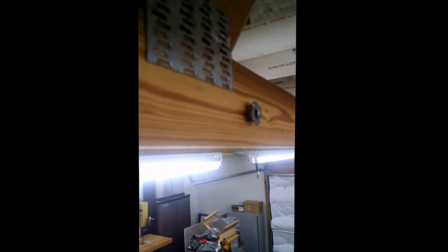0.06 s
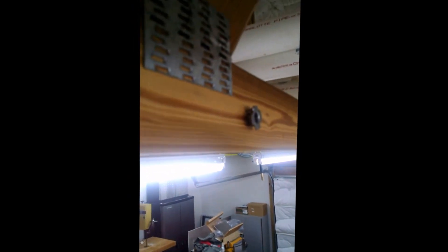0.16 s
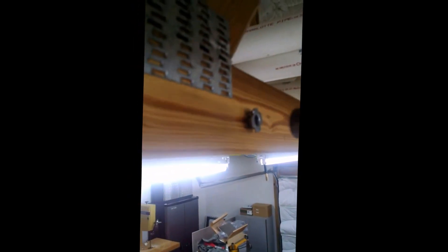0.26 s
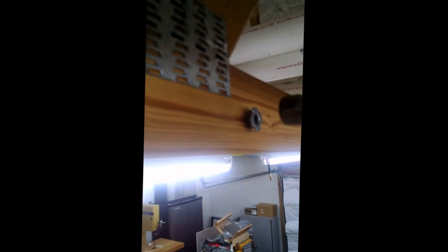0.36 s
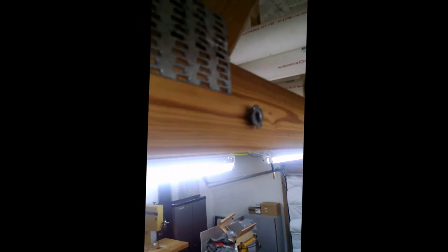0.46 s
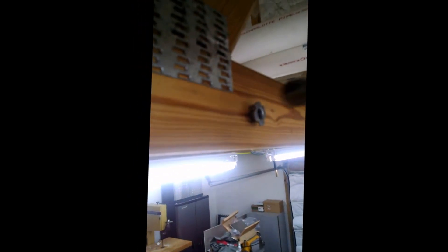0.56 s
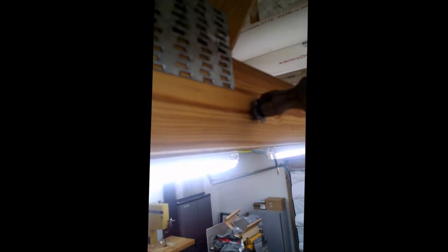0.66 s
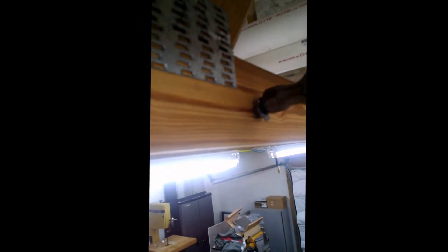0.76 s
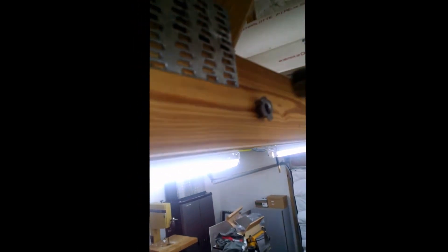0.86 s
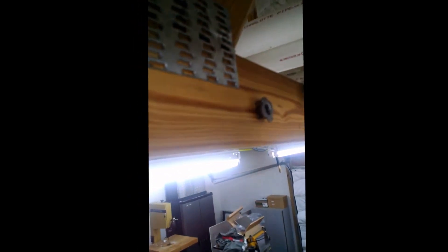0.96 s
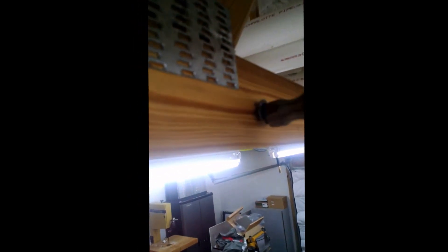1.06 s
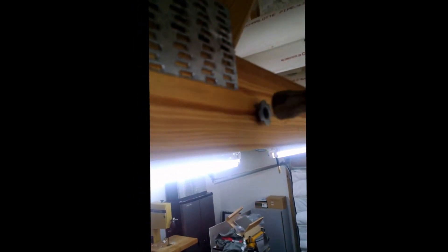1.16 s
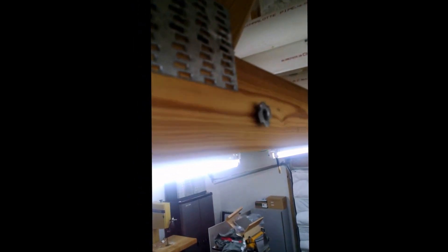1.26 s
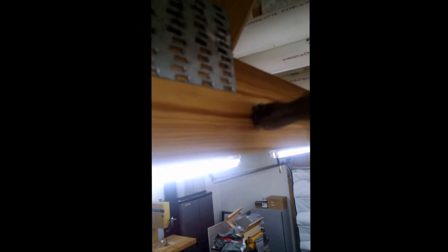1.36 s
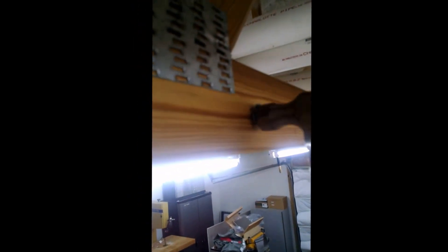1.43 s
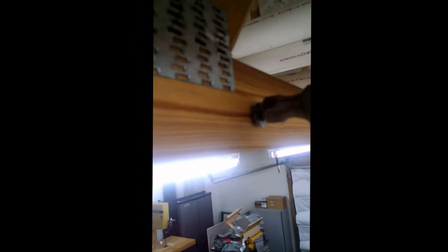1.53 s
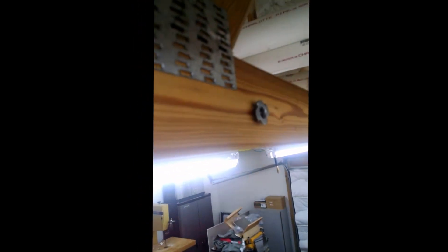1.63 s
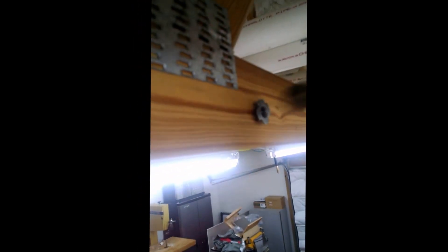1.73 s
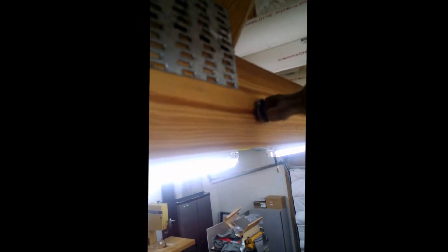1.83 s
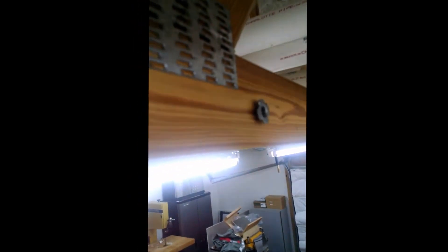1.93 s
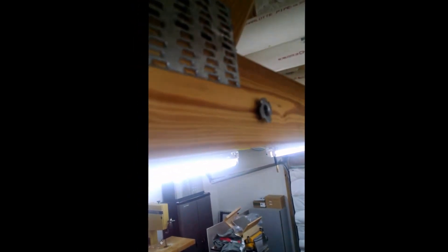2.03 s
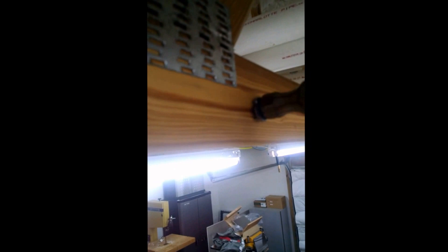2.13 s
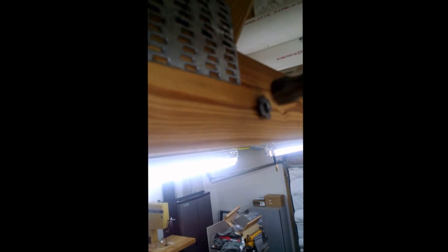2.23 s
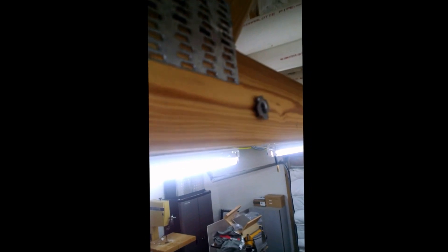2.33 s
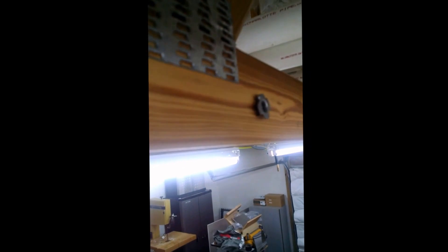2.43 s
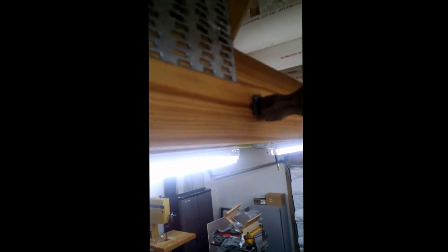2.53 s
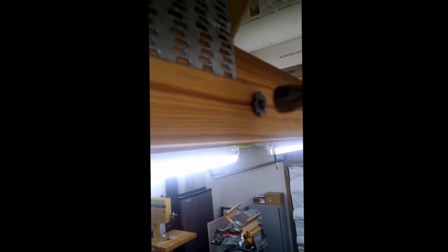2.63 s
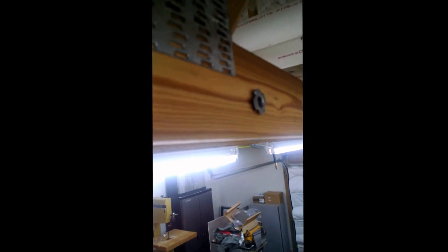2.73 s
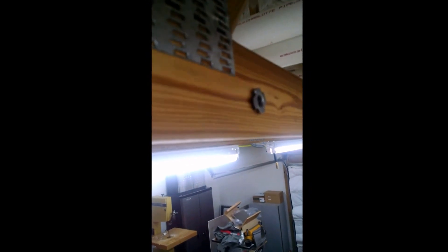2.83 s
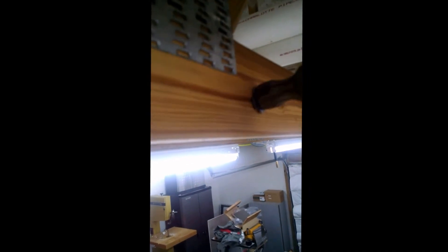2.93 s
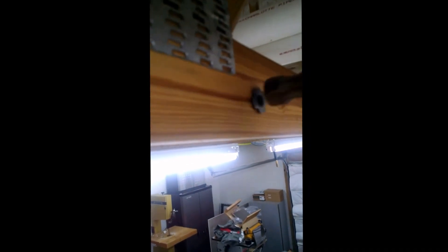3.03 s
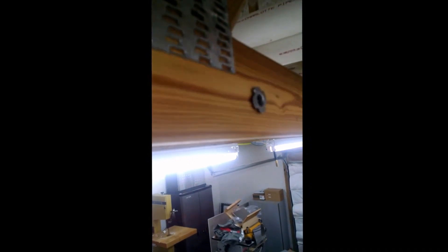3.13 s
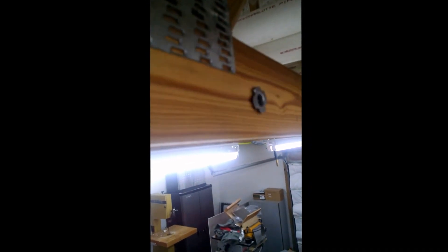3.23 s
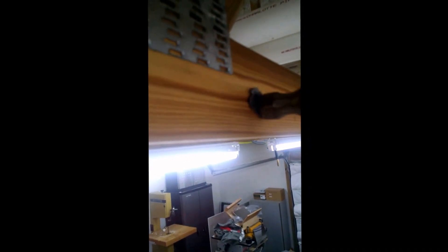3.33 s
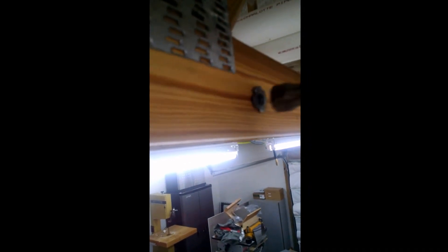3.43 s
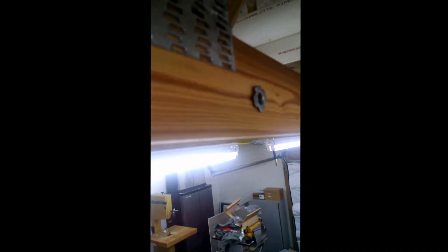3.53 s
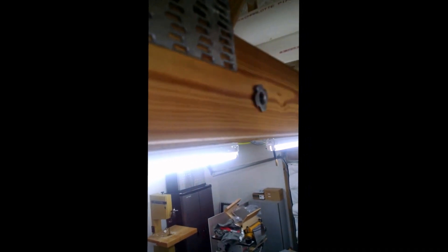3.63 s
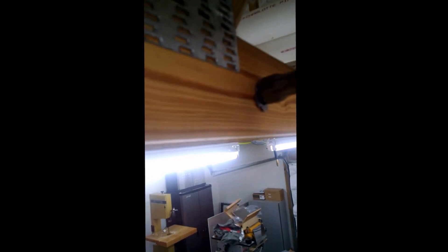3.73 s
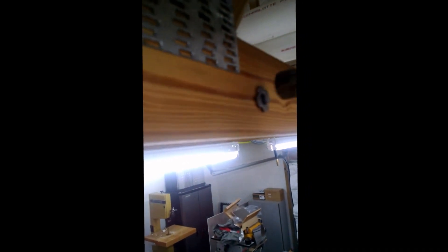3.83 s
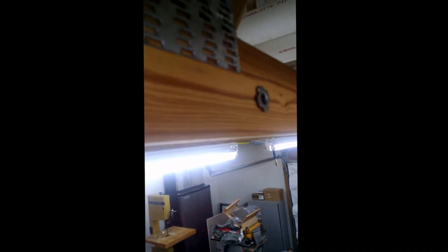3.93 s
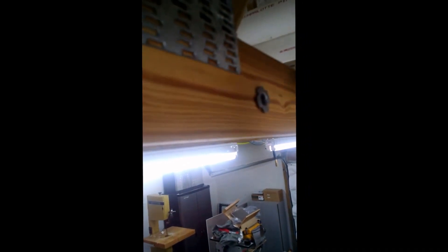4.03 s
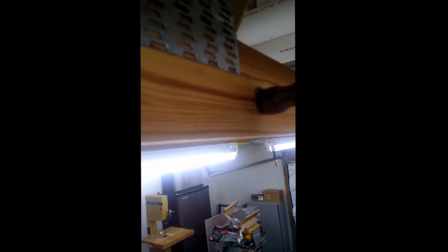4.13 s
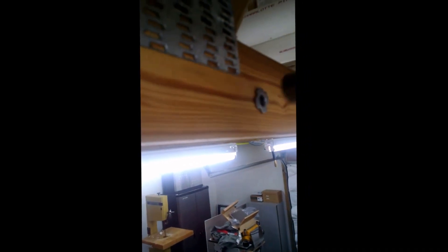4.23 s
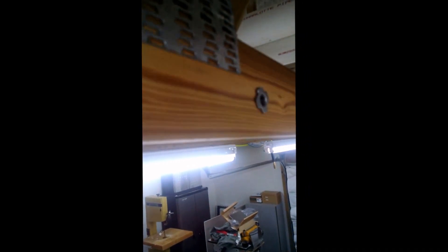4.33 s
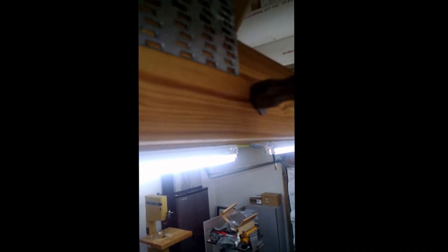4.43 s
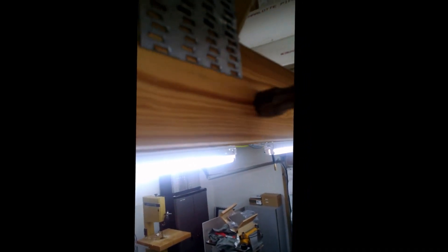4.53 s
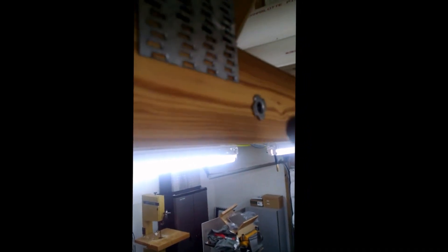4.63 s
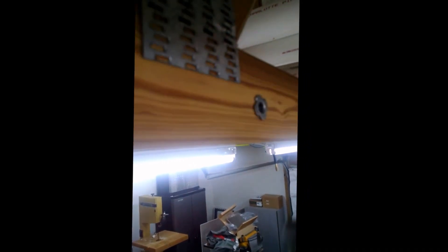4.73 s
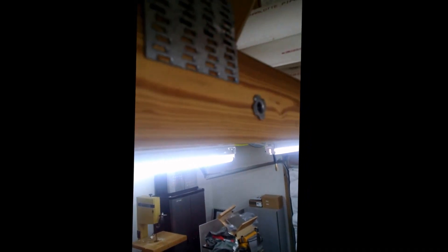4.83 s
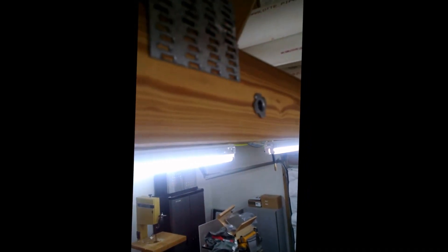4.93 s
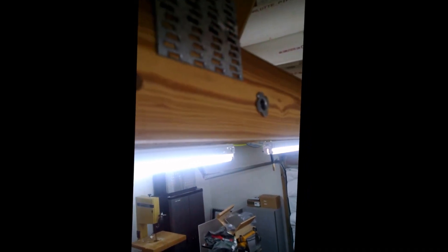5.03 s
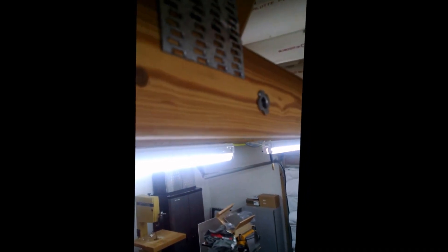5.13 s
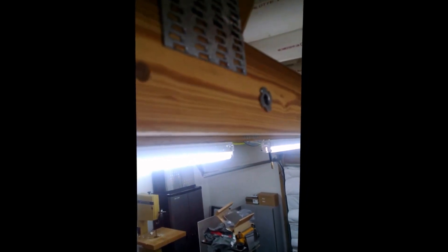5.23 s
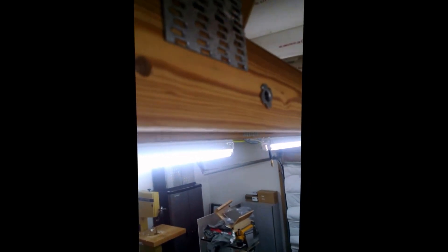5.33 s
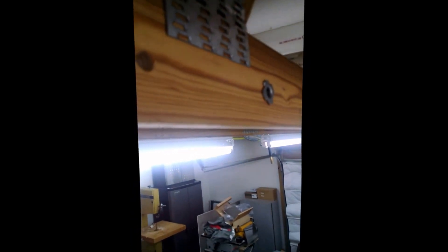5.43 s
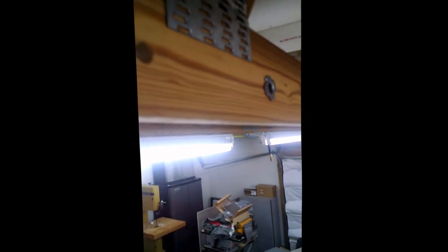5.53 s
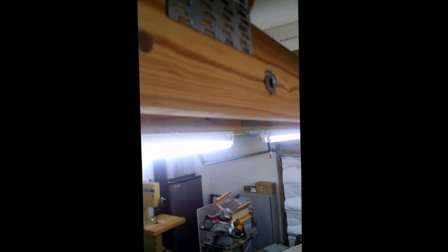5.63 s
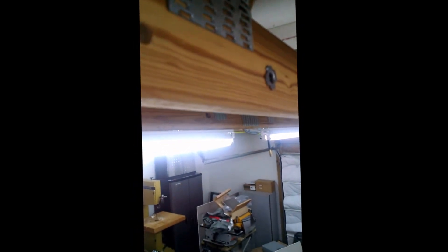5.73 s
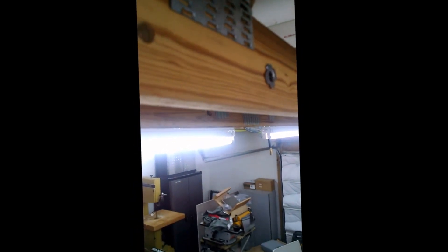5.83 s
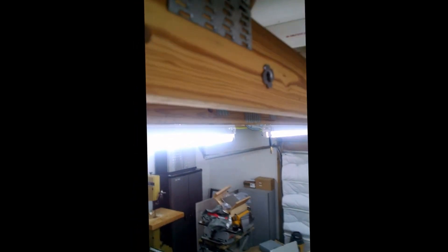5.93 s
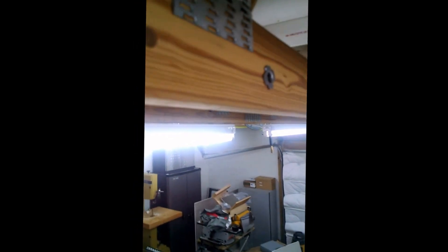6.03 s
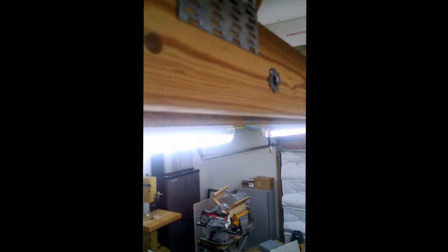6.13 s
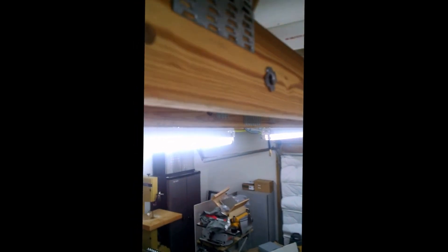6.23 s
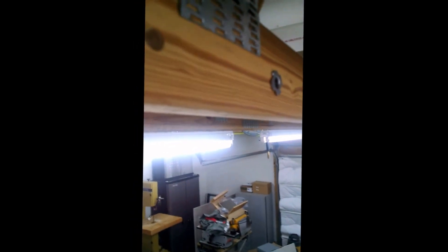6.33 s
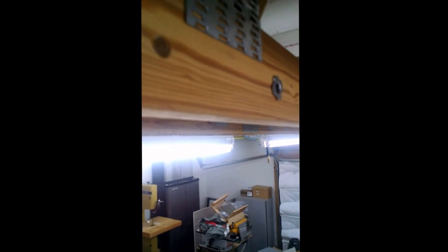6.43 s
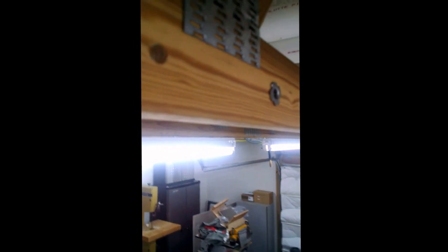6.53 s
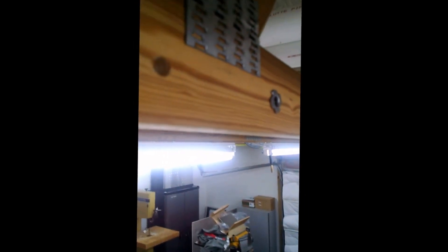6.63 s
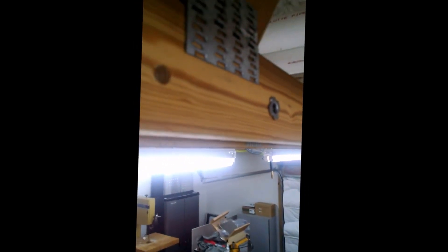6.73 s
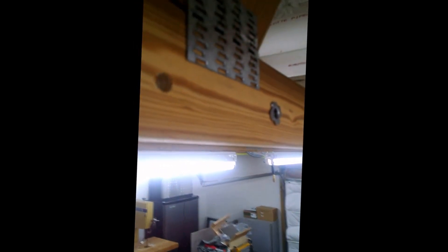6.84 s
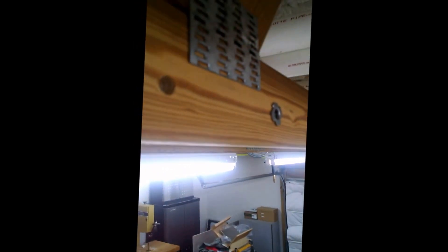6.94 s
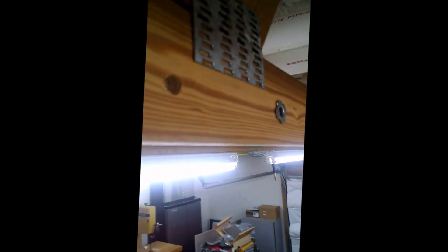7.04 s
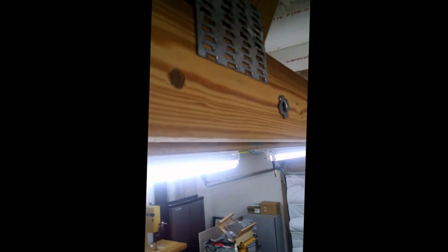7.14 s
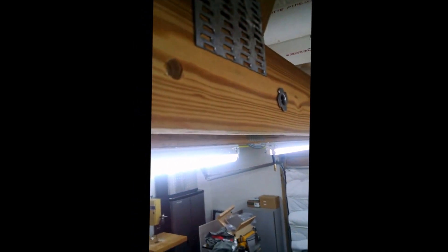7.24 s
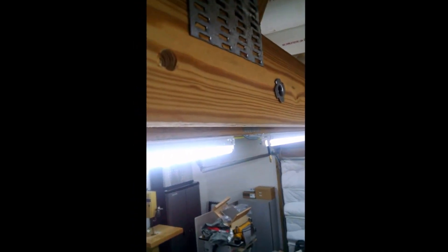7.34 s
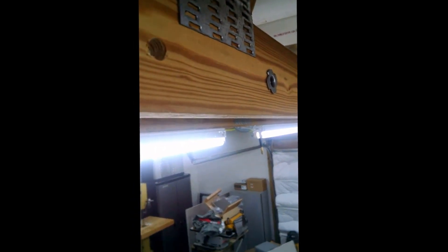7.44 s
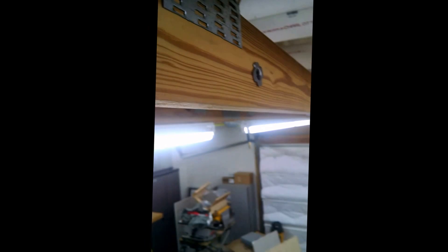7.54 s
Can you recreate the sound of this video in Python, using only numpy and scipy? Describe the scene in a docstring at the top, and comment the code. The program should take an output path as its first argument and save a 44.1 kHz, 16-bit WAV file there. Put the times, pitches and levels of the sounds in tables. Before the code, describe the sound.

Eleven hard hammer blows on a wooden beam, steady and rattling, then the hammer clatters onto a bench and fingers rub the microphone casing.

```python
"""A steel hammer drives a toothed nut into a pine beam in a workshop, close to a hand-held phone. Each blow is a
steel crack, a thud pulse and damped beam modes; loose parts rattle back and the shop answers in decaying noise.
Then the hammer drops on a bench (noise bursts and modes), and fingers rub and bump the phone's case (gated noise,
pushes and ticks), over rumble, hiss and, at first, a faint tone. The phone's two ports are widened to stereo
by subtracting each port, delayed, from the other."""
import sys
import numpy as np
from scipy import signal
from scipy.fft import rfft, irfft, next_fast_len
from scipy.io import wavfile
from scipy.ndimage import map_coordinates

SR = 44100
rng = np.random.default_rng(int(sys.argv[2]) if len(sys.argv) > 2 else 0)


def store_wav(level_fs):
    """Save 16-bit WAV to argv[1]."""
    pcm = np.round(np.clip(np.atleast_2d(level_fs), -1, 1) * 32767)
    wavfile.write(sys.argv[1], SR, pcm.T.astype(np.int16))


N = 334278
PORT_LAG_S = 17.3 / 44100  # travel time from one port to the other


def amp(db):
    """Decibels to an amplitude factor."""
    return np.exp(np.asarray(db) * np.log(10) / 20)


def unit(x):
    """Scale to rms 1."""
    return x / np.sqrt(np.mean(x ** 2) + 1e-20)


def along(points, hz):
    """Read a curve of (Hz, value) points on a log frequency axis."""
    point_hz, value = np.transpose(points)
    return np.interp(np.log(hz + 1), np.log(point_hz + 1), value)


def filtered(x, response):
    """Shape x in the spectrum by a complex response of frequency."""
    n = x.shape[-1]
    padded = next_fast_len(n + 4096)
    spectrum = rfft(x, padded) * response(np.fft.rfftfreq(padded, 1 / SR))
    return irfft(spectrum, padded)[..., :n]


def noise(spectrum, shape):
    """Coloured noise of rms 1."""
    white = rng.standard_normal(shape)
    return unit(filtered(white, lambda hz: amp(along(spectrum, hz))))


def click(spectrum):
    """One smooth pulse of energy 1 with this spectrum, centred on sample 200."""
    pulse = filtered(np.arange(400) == 200, lambda hz: amp(along(spectrum, hz)))
    return pulse / np.linalg.norm(pulse)


def wobble(rate):
    """A smooth random curve with this many knots a second."""
    knots = rng.standard_normal(int(N * rate / SR) + 4)
    return map_coordinates(knots, [np.arange(N) * rate / SR])


def ring(modes, t, scatter_db, rough):
    """Damped modes at new strengths each time; each phase wanders, rough in radians per root second."""
    hz, db, t60 = np.transpose(modes)[..., None]
    sign_draw, level_draw = rng.standard_normal((2, len(modes), 1))
    steps = rng.standard_normal((len(modes), len(t) // 8 + 1))  # one step every 8 samples
    walk = np.repeat(np.cumsum(steps, axis=1), 8, axis=1)[:, :len(t)]
    wander = rough * walk * np.sqrt(8 / SR)
    envelope = amp(db + scatter_db * level_draw - 60 * t / t60)
    return np.sum(np.sign(sign_draw) * envelope * np.sin(2 * np.pi * hz * t + wander), axis=0)


# How long the shop's main echo lasts. Each row: frequency in Hz, decay time (t60) in s.
SHOP_DECAY = [(60, 0.3), (160, 0.56), (420, 0.13), (1100, 0.3), (3000, 0.37), (8000, 0.26), (16000, .22)]


def echo(x, wet_db):
    """The shop's answer at both ports: a fresh noise tail each time, with a weak slower part from the far end."""
    hz, t, grid = signal.stft(rng.standard_normal((3, SR * 11 // 20)), SR, nperseg=256)
    fall_db = -60 * t / along(SHOP_DECAY, hz)[:, None]
    decay = amp(fall_db) + amp(-23 + .4 * fall_db)
    tail = signal.istft(grid * decay, SR, nperseg=256)[1]
    tail = tail[:2] + 0.62 * tail[2]  # part is common to the two ports
    tail = tail / np.linalg.norm(tail[0])
    return amp(wet_db) * signal.fftconvolve(x[None], tail, axes=1)


def add(out, s, x):
    """Mix x into out from s seconds, cut at the end of out."""
    part = out[:, round(s * SR):][:, :x.shape[1]]
    part += x[:, :part.shape[1]]


# Colour of each port's own rumble. Each row: frequency in Hz, relative density in dB.
OWN_RUMBLE = [(20, -17.5), (50, -8), (130, -1), (300, 3), (500, -7), (1000, -13.5), (2400, -6),
              (5000, -39.5)]
# Colour of the rumble common to both ports. Each row: frequency in Hz, relative density in dB.
COMMON_RUMBLE = [(20, -9), (40, -6), (130, 2), (300, -2.5), (500, -16), (1000, -22.5), (2000, -41.5)]
# Colour of the microphone hiss. Each row: frequency in Hz, relative density in dB.
MIC_HISS = [(1000, -23.5), (3000, -4.5), (7000, -7), (14500, -5.5), (16500, -12.5)]
RUMBLE_DB, HISS_DB = -51, -61  # before the first blow, ahead of the port gains
SINK_S, RUMBLE_SINK_DB, HISS_SINK_DB = .05, 16.5, 9.5  # both sink with the first blow and stay down
OPENING_DB, OPENING_S = 8, .15  # the hiss starts louder and settles
TONE_HZ, TONE_SAG_HZ_PER_S, TONE_DB, TONE_END_S, TONE_FADE_S = 1450, 60, -63, .53, .03


def background():
    """Shop rumble, partly common to the ports, microphone hiss, stronger at B, and a faint sinking tone."""
    now = np.arange(N) / SR
    sunk = np.clip((now - BLOWS[0][0]) / SINK_S, 0, 1)
    rumble_db = RUMBLE_DB - RUMBLE_SINK_DB * sunk
    hiss_db = HISS_DB - HISS_SINK_DB * sunk + OPENING_DB * np.exp(-now / OPENING_S)
    fade = np.clip((TONE_END_S - now) / TONE_FADE_S, 0, 1) * amp(2.5 * wobble(10))
    phase = 2 * np.pi * (TONE_HZ - TONE_SAG_HZ_PER_S * now / 2) * now
    tone = np.sqrt(2) * amp(TONE_DB) * fade * np.sin(phase)
    own = noise(OWN_RUMBLE, (2, N)) * amp([[-13], [-6]])
    common = noise(COMMON_RUMBLE, N) * amp([[2.5], [4]])
    rumble = amp(rumble_db + 1.6 * wobble(31)) * (own + common)
    hiss = amp(hiss_db + 0.95 * wobble(22)) * noise(MIC_HISS, (2, N)) * amp([[-1.5], [0]])
    return rumble + hiss + tone * amp([[-11], [-5]])


# Colour of skin hissing over the case. Each row: frequency in Hz, relative density in dB.
SKIN_HISS = [(2000, -26.5), (4000, -14.5), (7000, -10.5), (10000, -5), (14500, -3.5), (16500, -13)]
# Colour of the case being scraped. Each row: frequency in Hz, relative density in dB.
CASE_SCRAPE = [(20, -13.5), (60, -1), (200, -4.5), (500, -9), (1000, -16), (2500, -19), (5000, -36.5)]
# Finger strokes, each swelling to a peak and dying. Each row: peak time in seconds, hiss level in dB,
# scrape level in dB re the hiss, rise in s, fall in s (both over 20 dB).
STROKES = [(5.98, -43, -6, .12, .015), (6.0, -55, 0, .01, .14), (6.16, -49, -9, .01, .07),
           (6.3, -55, -5, .15, .04), (6.333, -40, -12, .01, .12), (6.387, -40, 15, .03, .02),
           (6.555, -44.5, 3, .04, .2), (6.645, -48, 2, .1, .07), (6.872, -36, 0, .004, .022),
           (6.925, -50, 10, .05, .12), (7.15, -43, 5, .14, .1), (7.225, -31, 0, .045, .022),
           (7.32, -45, 10, .08, .1), (7.405, -34, 7, .09, .09), (7.48, -46, 6, .05, .07),
           (7.545, -38, 7, .05, .04), (7.58, -28, 1, .025, .02)]
GRIP_S, GRIP_DB, GRIP_SCRAPE_DB = 6.15, -66, 9  # from here on the resting hand rubs faintly; scrape re hiss
# Colour of the ticks and of the catching ridges. Each row: frequency in Hz, relative density in dB.
TICK = [(200, 13.5), (1000, -3), (3000, -5), (6000, -14.5), (15000, -5.5)]
# Shifts of grip. Each row: start in seconds, push level in dB, tick level in dB, push time constant in ms.
GRIP_SHIFTS = [(6.157, -37, -47, 1.9), (6.301, -31, -35, .6), (6.381, -36, -18, 3.2),
               (6.417, -27, -46, 2.7), (6.441, -15, -22, 1.02), (6.549, -27, -43, 1.1),
               (6.64, -19, -35, 1.1), (6.684, -24, -55, .58), (6.817, -31, -45, .53), (6.869, -25, -33, .7),
               (6.907, -35, -42, 1.2), (6.99, -22, -39, 1.6), (7.088, -28, -44, .92), (7.117, -20, -45, .7),
               (7.139, -30, -48, .7), (7.159, -29, -40, .73)]


def rubbing(speed, pressure):
    """Skin slips in grains: hiss follows the finger's speed, scrape its pressure, with ridges that catch."""
    slips = amp(1.5 * wobble(70) + 1.7 * wobble(600))
    catches = (rng.random(N) < 150 / SR) * amp(1.7 * rng.standard_normal(N))  # about 150 a second
    hiss = speed * unit(slips * noise(SKIN_HISS, N))
    grain = unit(filtered(catches, lambda hz: amp(along(TICK, hz))))
    body = slips * amp(3.5 * wobble(25)) * noise(CASE_SCRAPE, N)
    return hiss + pressure * unit(body + 0.2 * grain)


def grip_shift(push_db, tick_db, push_ms):
    """The case is pushed in and springs back in one slow pulse, with a short noise tick."""
    t = np.arange(SR // 20) / SR
    u = t * 1000 / max(push_ms, .2)
    push = -4 * u * (1 - u / 2.2) * np.exp(-u)
    return amp(push_db) * push + amp(tick_db - 60 * t / 0.023) * noise(TICK, len(t))


def fingers():
    """Fingers rub and bump the case beside port B; port A gets a trace of that and the rubbing through the air."""
    now = np.arange(N) / SR
    peak_s, hiss_db, scrape_db, rise_s, fall_s = np.transpose(STROKES)[..., None]
    slope_s = np.where(now < peak_s, rise_s, fall_s)
    swell = amp(hiss_db - 20 * np.abs(now - peak_s) / slope_s)
    grip = amp(GRIP_DB) * np.clip((now - GRIP_S) / .1, 0, 1)
    speed = grip + swell.sum(axis=0)
    pressure = amp(GRIP_SCRAPE_DB) * grip + (amp(scrape_db) * swell).sum(axis=0)
    touch = rubbing(speed, pressure)[None]
    for s, push_db, tick_db, push_ms in GRIP_SHIFTS:
        add(touch, s, grip_shift(push_db, tick_db, push_ms)[None])
    airborne = amp(-3) * speed * noise(SKIN_HISS, N)
    return np.array([0.02 * touch[0] + airborne, touch[0]])


# Bright clack of the dropped hammer. Each row: frequency in Hz, relative density in dB.
CLACK = [(600, -40), (2000, -15), (4000, 3), (8000, 3), (11000, -3), (15000, 2), (17000, -0.5)]
# Duller knock of the tool. Each row: frequency in Hz, relative density in dB.
KNOCK = [(60, -56), (120, -42), (260, -8.5), (450, 9), (700, -3.5), (1400, -2.5), (3000, 0), (4500, -32.5)]
# Modes of the bench. Each row: frequency in Hz, relative level in dB, decay time (t60) in s.
BENCH_MODES = [(280, -5.5, 0.5), (354.5, -4.5, 0.37), (405, -6, 0.47), (476, -2, 0.1), (960, -16, 0.3),
               (1333, -14, 0.3), (1450, -7, 0.14), (2190, -12, 0.05), (2840, -6.5, 0.22)]
# The hammer lands and rocks. Each row: start in seconds, level in dB, brightness in dB re that level.
LANDINGS = [(5.444, -9, -17), (5.478, -8, -6), (5.574, -14.5, -6.5), (5.629, -10, -18),
            (5.666, -22.5, -12.5), (5.711, -19, -22), (5.729, -21.5, -14), (5.759, -24.5, -20.5),
            (5.789, -25, -18.5)]


def dropped():
    """The hammer clatters on the bench beyond port B; A hears it later and, shaded by the phone, duller."""
    out, t = np.zeros((2, N)), np.arange(SR // 3) / SR
    for s, db, bright_db in LANDINGS:
        clack = noise(CLACK, len(t)) * amp(-60 * t / 0.013) * (1 - np.exp(-t / 0.0013))
        clack = amp(db + bright_db + 8.5) * clack
        knock = amp(db + .8) * noise(KNOCK, len(t)) * amp(-60 * t / 0.02) * (1 - np.exp(-t / 0.0012))
        board = amp(db - 16) * ring(BENCH_MODES, t, scatter_db=3, rough=13.4)
        board = board * (1 + 0.5 * amp(-60 * t / 0.028))  # stronger at the onset
        add(out, s, (clack + knock + board) * amp([[-25], [3]]))
        into_shop = amp(bright_db + 23) * click(CLACK) + amp(14) * click(KNOCK)
        add(out, s, echo(into_shop, wet_db=db) * amp([[-13], [0]]))
    shaded = filtered(out[1], lambda hz: .5 * np.exp(-2j * np.pi * hz * PORT_LAG_S) / (1 + (hz / 750) ** 4))
    ports = np.array([out[0] + shaded, out[1]])
    return filtered(ports, lambda hz: hz ** 2 / (hz ** 2 + 90 ** 2))  # the bench gives no deep bass


# Colour of the steel crack. Each row: frequency in Hz, relative density in dB.
STEEL = [(150, -16), (600, 4.5), (1500, -6), (3400, -6), (6000, -12), (10000, -13), (15300, -10),
         (17000, -30.5)]


def steel_crack(t):
    """Steel on steel: bright noise with a fast decay and a weaker, slower one."""
    return noise(STEEL, len(t)) * (amp(-60 * t / 0.013) + amp(-22.5 - 60 * t / .06))


def thud(t):
    """The beam takes the blow: one short pulse around 600 Hz."""
    return (t / 0.0013) * np.exp(1 - t / 0.00069) * np.cos(2 * np.pi * 600 * (t - .0013))


# Modes of beam and joists. Each row: frequency in Hz, relative level in dB, decay time (t60) in s.
BEAM_MODES = [(166.8, -5.5, 0.13), (213.6, -10, .25), (257.4, -13.5, 0.47), (296.6, -4.5, 0.22),
              (353.3, -9.5, 0.31), (425.2, -2, .2), (470.4, -11.5, 0.28), (536, -7.5, 0.13),
              (686.5, -7.5, 0.094), (742.3, -3, 0.09), (785.5, -6, 0.09), (1045, -1, 0.04),
              (1143, -22.5, 0.094), (1232, -13, .1), (1490, -13.5, 0.032), (1836, -7, 0.027),
              (2090, -17.5, .06)]


def beam_ring(t):
    """Beam and joists ring on in damped modes, roughened by loose joints, with a soft start and a full fade."""
    wood = ring(BEAM_MODES, t, scatter_db=3.0, rough=6.8) * (1 - np.exp(-t / 0.003))
    return wood * (1 - t / t[-1])


# Slow modes of the building. Each row: frequency in Hz, relative level in dB, decay time (t60) in s.
FRAME_MODES = [(34.3, 5, 0.61), (63.4, -2.5, .4), (98, -1.5, 1.5), (124, -1.5, 0.9)]


def building_sway(t):
    """The building shakes slowly, alike at both ports until the port gain."""
    return ring(FRAME_MODES, t, scatter_db=4, rough=8.0) * (1 - t / t[-1]) * np.ones((2, 1))


def loose_chatter(t, pine):
    """Loose parts chatter: random dying taps, about 260 a second, each sounding as a pine thud."""
    taps = (rng.random(len(t)) < 260 / SR) * rng.standard_normal(len(t)) * amp(-60 * t / 0.29)
    return signal.fftconvolve(taps, pine)


# High modes, heard as the microphone port resonating near 14 to 17 kHz. # Each row: frequency in Hz, relative
# level in dB, decay time (t60) in s.
PING_MODES = [(14200, -8, 0.0053), (16600, -4.5, 0.017), (15700, -7, .015), (15350, -24, .16)]


def port_ping(t):
    """Each blow sets off a short, very high ping, as of the microphone port resonating."""
    return ring(PING_MODES, t, scatter_db=2.1, rough=50)


def phone_jolt(t):
    """The blow jolts the phone: one quick push against a small, slower return."""
    u = t / .0011
    return u * np.exp(1 - u) - 0.029 * np.exp(-t / .03)


# The thud in the air. Each row: frequency in Hz, relative density in dB.
PINE = [(60, -21.5), (160, -4.5), (300, 4.5), (450, 3.5), (750, 0), (1100, -13), (1800, -13), (3000, -28)]
# The beam at port B re port A. Each row: frequency in Hz, gain in dB.
PORT_B_GAIN = [(40, -7.5), (300, -2.5), (800, -16.5), (2500, 9), (8000, 1.5), (15000, 3.5)]
# Hammer blows; thud and ring grow as the nut seats. Each row: start in seconds, thud level in dB,
# steel crack level in dB, ring and echo level in dB, ping level in dB, jolt level in dB.
BLOWS = [(.683, -10, -10, -26, -10, -12), (1.083, -1, -15, -16, -9, -1), (1.461, -1, -13, -16, -7, -10),
         (1.838, 0, -12, -14, -3, -11), (2.188, 1.5, -11, -12.5, -7, -10), (2.558, 0, -10, -14.5, -11, -6),
         (2.949, 4, -8, -10.5, -5, -8), (3.354, 2.5, -8, -11.5, -8, -5), (3.742, 3, -12, -11.5, -26, -15),
         (4.137, 4, -10, -9.5, -8, 2), (4.513, 5, -14, -9.5, -12, -7)]
# Loose parts rattle back onto the beam after a blow. Each row: start in seconds, thud level in dB.
RATTLES = [(.76, -31), (1.13, -19), (1.162, -21), (1.51, -17), (1.89, -12), (2.234, -13), (2.605, -12),
           (2.638, -10), (2.679, -19), (2.994, -12), (3.053, -15), (3.4, -13), (3.469, -15), (3.789, -18),
           (3.856, -24), (4.189, -16), (4.239, -16), (4.56, -18), (4.611, -21)]
RATTLE_CRACK_DB, RATTLE_RING_DB = -23, -11  # re the rattle's thud


def hammer():
    """Each contact cracks, thuds, rings the beam and sways the building; blows also ping and jolt the phone."""
    near, jolt, far = np.zeros((1, N)), np.zeros((1, N)), np.zeros((2, N))
    short, t, long = np.arange(SR // 10) / SR, np.arange(SR // 3) / SR, np.arange(SR * 3 // 4) / SR
    steel, pine = click(STEEL), click(PINE)
    contacts = [row[:4] for row in BLOWS]
    contacts += [(s, db, db + RATTLE_CRACK_DB, db + RATTLE_RING_DB) for s, db in RATTLES]
    for s, db, crack_db, ring_db in contacts:
        add(near, s, (amp(db) * thud(short) + amp(crack_db) * steel_crack(short))[None])
        add(near, s - 150 / SR, amp(crack_db + 8) * steel[None])  # one solid snap, centred 50 samples after s
        add(near, s, amp(ring_db) * beam_ring(t)[None])
        add(near, s + .01, amp(ring_db + 4) * loose_chatter(t, pine)[None])
        add(far, s, amp(ring_db - 27) * building_sway(long))
        into_shop = amp(crack_db - db + 21.5) * steel + amp(18.5) * pine
        add(far, s, echo(into_shop, wet_db=ring_db))
    for s, *_, ping_db, jolt_db in BLOWS:
        add(near, s, amp(ping_db) * port_ping(short)[None])
        add(jolt, s, amp(jolt_db) * phone_jolt(short)[None])
    # port B hears the near sounds 0.12 ms later
    port_b = filtered(near[0], lambda hz: amp(along(PORT_B_GAIN, hz)) * np.exp(-2j * np.pi * hz * 1.2e-4))
    return np.array([near[0], port_b]) + far * amp([[0], [-2]]) + jolt * amp([[0], [-8]])


def scene():
    """All sources at the two ports, A then B."""
    return background() + fingers() + dropped() + hammer()


WIDEN, SHADE_HZ = .66, 2500  # share of the delayed other port subtracted; port A's share fades above this
TOP_HZ = 15900  # upper band limit


def record(dry):
    """Each side is its port minus the other a little later; peaks are rounded off, then the top is cut steeply."""
    def delay_and_shade(hz):
        shade = [np.ones_like(hz), 1 + (hz / SHADE_HZ) ** 2]
        return np.exp(-2j * np.pi * hz * PORT_LAG_S) / shade
    late = filtered(dry[::-1], delay_and_shade)
    wide = dry - WIDEN * late
    limited = wide / (1 + np.abs(wide) ** 6) ** (1 / 6)
    return filtered(limited, lambda hz: 1 / (1 + (hz / TOP_HZ) ** 110))


dry = scene()
out = record(dry)
store_wav(out)
```